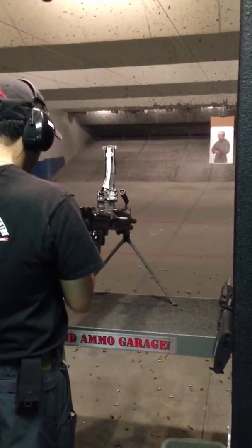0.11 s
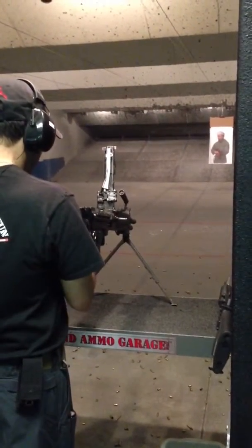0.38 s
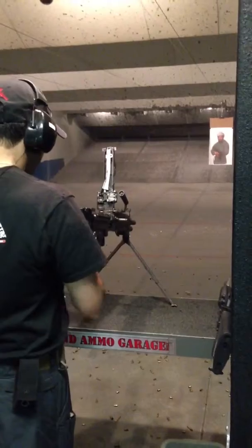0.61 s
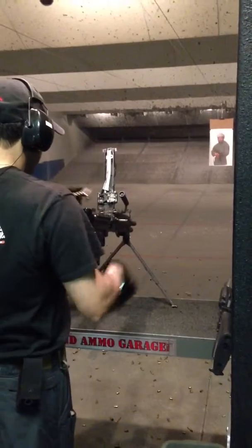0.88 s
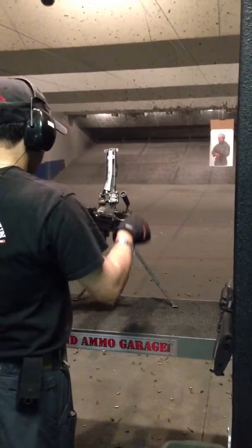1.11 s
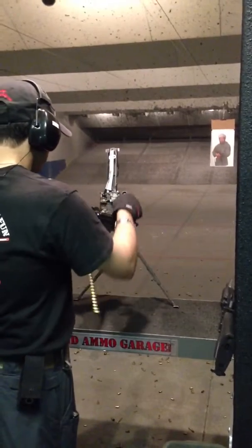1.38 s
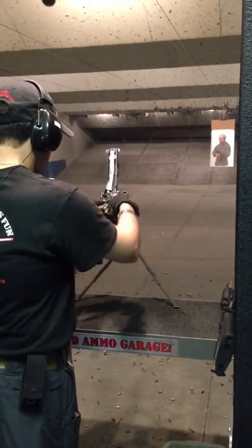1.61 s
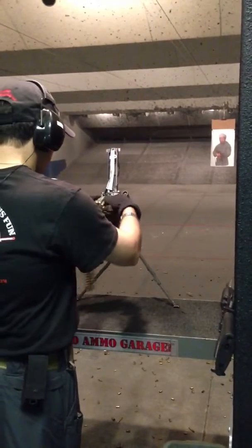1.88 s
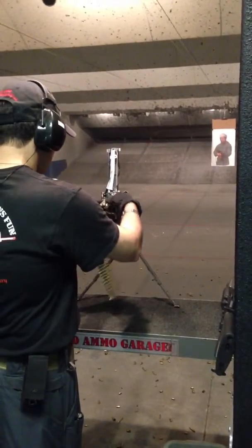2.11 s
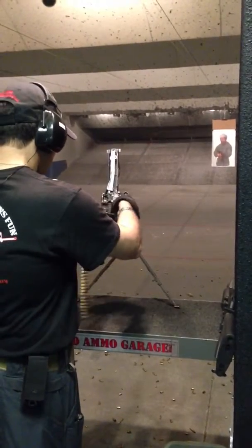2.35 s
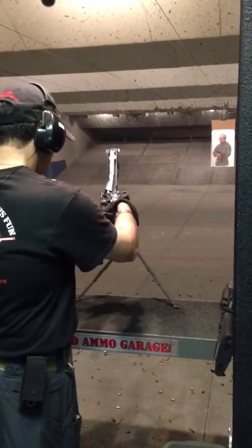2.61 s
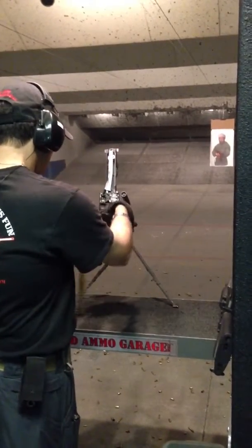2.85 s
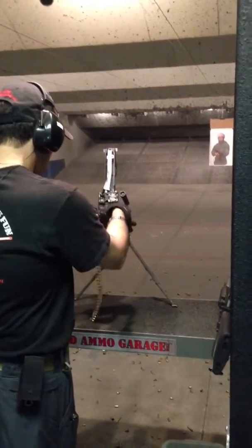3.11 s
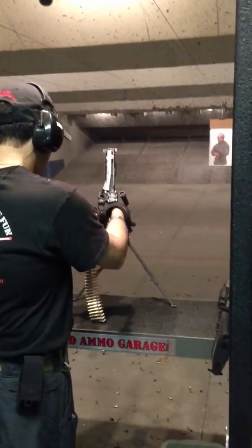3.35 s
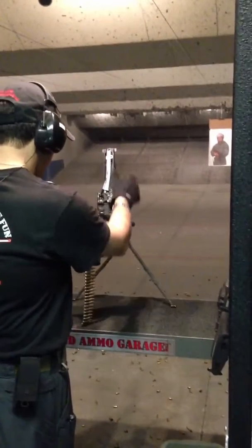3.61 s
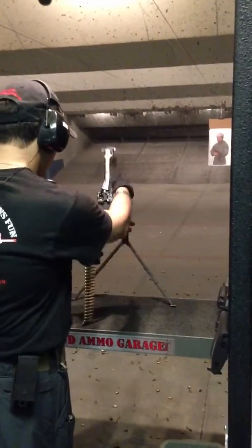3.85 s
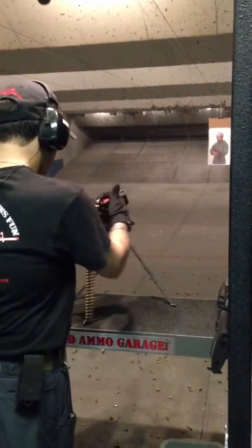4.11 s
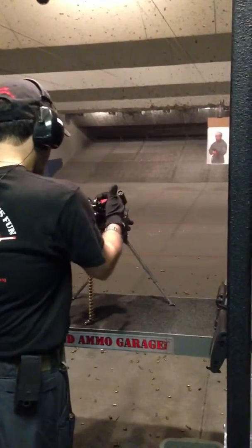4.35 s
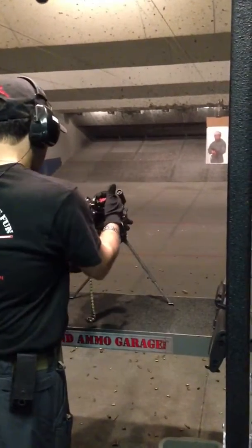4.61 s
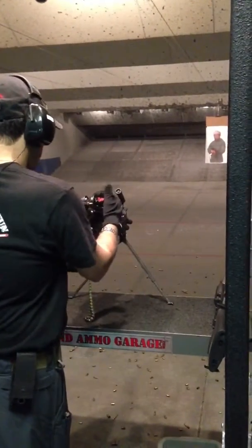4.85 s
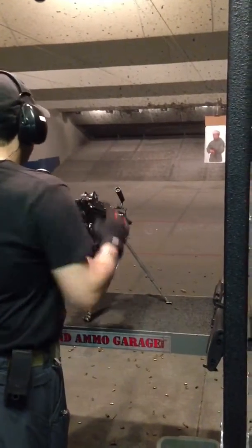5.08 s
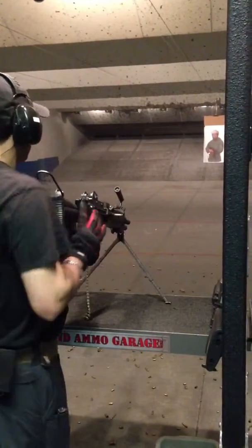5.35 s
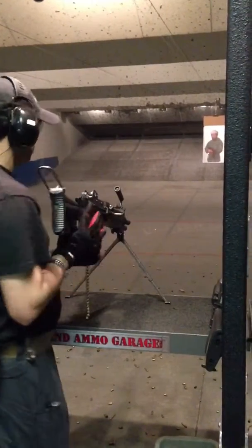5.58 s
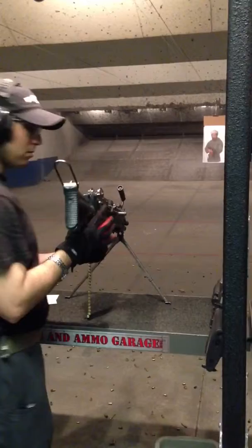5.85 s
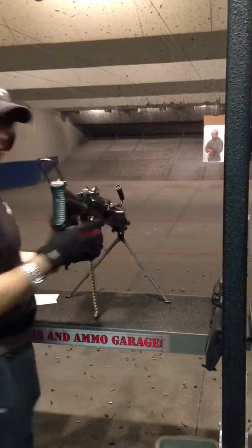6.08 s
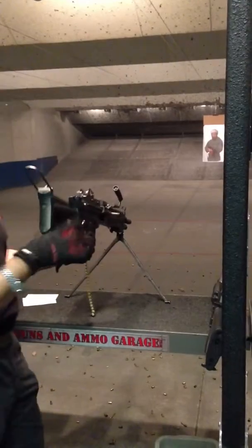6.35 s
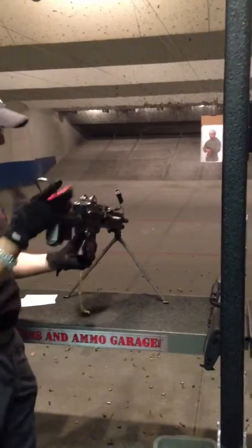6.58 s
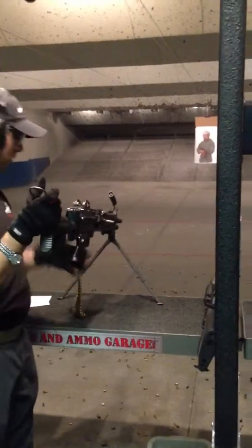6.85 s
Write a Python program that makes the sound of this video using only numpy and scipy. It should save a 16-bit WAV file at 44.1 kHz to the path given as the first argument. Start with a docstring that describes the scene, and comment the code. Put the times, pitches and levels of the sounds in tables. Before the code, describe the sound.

A phone close to the firing bench picks up deep ventilation rumble and widely spaced rifle shots from another lane, their booming reverberation filling the concrete hall. Between them come belt and metal clicks, high ringing bounces of brass cases, and a loud bright slam of a feed cover midway. Handling then becomes faint and sparse before a last shot roars near the end. The loud blasts sound squashed.

```python
"""Long concrete indoor range: single rifle shots from a neighbouring lane fill it with echo, over ventilation rumble.
Shots are shaped random reflections plus low pulses; the rumble is shaped noise with duct resonances.
Spent brass cases bounce and ring on the floor as beating sine modes.
Close by a gun is being loaded: belt clicks and a cover slammed shut, made of decaying noise.
A phone microphone with a limiter and slow gain control picks it up."""
import sys
import numpy as np
from scipy import signal
from scipy.fft import rfft, irfft
from scipy.io import wavfile
from scipy.ndimage import uniform_filter1d

SR = 44100
rng = np.random.default_rng(int(sys.argv[2]) if len(sys.argv) > 2 else 0)


def boost(x):
    """Linear amplitude factor 10**(x/20) for a level x in decibels (scalar or array-like)."""
    u = np.asarray(x, float) / 20
    return 10 ** u


def pcm_store(signal):
    """Save signal as 16-bit PCM."""
    levels = np.round(np.clip(np.atleast_2d(signal), -1, 1) * 32767)
    wavfile.write(sys.argv[1], SR, levels.astype(np.int16).T)


N = 306922  # samples

# spectrum shared by case ticks and metal clicks: hz, density_db_per_hz
CLICK_COLOUR = [(880, -43), (1500, -16), (2700, -2), (3180, -9), (4530, -0.5), (7670, 0.5), (13400, -6),
                (15500, -15)]


def evened(x):
    """Scales to rms 1."""
    return x / np.sqrt(np.mean(x ** 2) + 1e-20)


def read(table_hz, values, hz):
    """Reads a table along log frequency."""
    return np.interp(np.log(hz + 1), np.log(np.asarray(table_hz) + 1), values)


def add(mix, start_s, sound):
    """Mixes a sound in at start_s, which may lie before the start."""
    at = round(start_s * SR)
    sound = sound[max(-at, 0):]
    part = mix[max(at, 0):][:len(sound)]
    part += sound[:len(part)]


def coloured(colour, count):
    """Steady noise of rms 1 with the given spectrum."""
    hz = np.fft.rfftfreq(count, 1 / SR)
    spectrum = rfft(rng.standard_normal(count)) * boost(read(*np.transpose(colour), hz))
    return evened(irfft(spectrum, count))


def reflections(count):
    """STFT of sparse reflections of random sign and size, one in every 8 samples."""
    taps = np.zeros(count)
    slots = np.arange(0, count - 8, 8)
    taps[slots + rng.integers(0, 8, len(slots))] = rng.standard_normal(len(slots))
    return signal.stft(evened(taps), SR, nperseg=1024, noverlap=896)


def echo_shape(hz, t):
    """Hall gain over pitch and time: each band builds up, then dies at two speeds."""
    # echo of one shot by band: hz, level_db, late_tail_db (against level_db)
    hall = [(40, -54, -31), (110.4, -10, -32), (171, 12, -23), (340, 8, -21.5), (556, 5, -39.5),
            (1285, 0.5, -20), (1920, -3, -30), (2430, -1, -25), (4770, -3.5, -30.5), (9040, -8, -41.5),
            (13000, -11, -62), (15500, -14, -49)]
    # the roar holds until the longest paths run out, then drops: delay_s, drop_db, width_s
    step = (0.77, 2.7, 0.012)
    table_hz, *columns = np.transpose(hall)
    level_db, late_db = (read(table_hz, column, hz)[:, None] for column in columns)
    hz = hz[:, None] + 1

    # dB/s: walls take a steady share, air more with pitch, the deepest bass leaks out
    wall_db_per_s, air_db_per_s_khz, leak_hz = 37, 7.5, 82
    leak = np.minimum(leak_hz / hz, 2) ** 2
    fade_db_per_s = wall_db_per_s * (1 + leak) + air_db_per_s_khz * hz / 1000
    late_fade_db_per_s = 16.5 + 2 * hz / 1000

    build_cycles, build_max_s = 50, 0.31
    rise_s = np.minimum(build_cycles / hz, build_max_s)
    build = (1 - np.exp(-(t + 0.08) / rise_s)) ** 2
    decay = boost(-fade_db_per_s * t) + boost(late_db - late_fade_db_per_s * t)
    shape = boost(level_db) * build * decay

    delay_s, drop_db, width_s = step
    shape *= boost(-drop_db / (1 + np.exp((delay_s - t) / width_s)))
    # reflections bunch up in pitch and time
    lumps = uniform_filter1d(rng.standard_normal(shape.shape), 8, 0)
    lumps = uniform_filter1d(lumps, 16, 1)
    return shape * boost(1.22 * evened(lumps))


def wall_slaps(t):
    """A short low thump at each onset, then low pushes thrown back by the end walls, as Gaussian cosine pulses."""
    # delay_s, level_db, pitch_hz
    slaps = [(.003, -34.5, 60), (0.189, -10.5, 231), (0.333, -15, 232), (0.433, -19, 298),
             (0.681, -26, 215)]
    out = np.zeros(len(t))
    for delay_s, level_db, hz in slaps:
        late_s = t - delay_s
        out += boost(level_db) * np.cos(2 * np.pi * hz * late_s) * np.exp(-(hz * late_s / 1.14) ** 2)
    return out


def lead_in(t):
    """Runs ahead of the blast: a faint noise that grows, then a thin ring that swells."""
    # hiss spectrum: hz, density_db_per_hz
    lead_colour = [(240, -23), (400, 2.5), (2150, -11.5), (2970, -5), (3510, -5), (15500, -20)]
    ring_db, ring_hz, ring_s, swell_s = -8, 2922, .015, .0055
    hiss_db, hiss_rise_db_per_s = -36.5, 410
    swell = np.exp(-abs(t) / swell_s) * np.clip((t + ring_s) / ring_s * 4, 0, 1)
    ring = boost(ring_db) * swell * np.sin(2 * np.pi * ring_hz * t)
    hiss = boost(hiss_db + hiss_rise_db_per_s * (t - t[0])) * coloured(lead_colour, len(t))
    return ring + hiss


def blast_rush(t):
    """Dull noise that swells into the blast and dies briefly past it."""
    # hz, density_db_per_hz
    rush_colour = [(250, -23), (500, 2), (1500, -1), (2100, -8), (3000, -40.5)]
    level_db, swell_s = -3, 0.0031
    return boost(level_db) * np.exp(-abs(t) / swell_s) * coloured(rush_colour, len(t))


def shots():
    """Every shot wakes the same reflections; moving air renews the treble most."""
    # start_s, level_db
    shot_times = [(-.060, -1), (1.664, -0.5), (3.408, -1), (6.3921, -1)]
    shot_db, lead_s = 19, .022
    count = 3 * SR
    hz, frame_s, same = reflections(count)
    shape = echo_shape(hz, frame_s)

    # share of echo power new at each shot: at the bottom, and the pitch where half the rest is new
    new_low, new_half_hz = 0.13, 6000
    hz = hz[:, None] + 1
    new = new_low + (1 - new_low) * hz / (hz + new_half_hz)

    t = np.arange(count) / SR
    slaps = wall_slaps(t)
    ahead_s = np.arange(-lead_s, .004, 1 / SR)
    lead = lead_in(ahead_s)
    near_s = np.arange(-lead_s, lead_s, 1 / SR)
    rush = blast_rush(near_s)

    out = np.zeros(N)
    for start_s, level_db in shot_times:
        z = np.sqrt(1 - new) * same + np.sqrt(new) * reflections(count)[2]
        echo = signal.istft(z * shape, SR, nperseg=1024, noverlap=896)[1][:count]
        onset = np.minimum(t / 0.0021, 1)
        add(out, start_s, boost(shot_db + level_db) * (echo + slaps) * onset)
        add(out, start_s + ahead_s[0], lead)
        add(out, start_s + near_s[0], rush)
    return out


def ventilation():
    """Low rumble of fans with fuzzy duct resonances; the level wanders a little."""
    # broad noise: hz, density_db_per_hz
    air = [(15, -60), (25, -42.5), (90, -17), (160, -9.5), (310, -12.5), (355, -22.5), (800, -17.5),
           (1050, -26), (3600, -35.5), (7300, -45), (10500, -54), (15500, -57)]
    # duct resonances: pitch_hz, width_hz (at -6 dB), peak_db_per_hz
    ducts = [(126.7, 18.6, -3.5), (142.4, 13, -5), (188.4, 50, -1), (261.8, 9, 3), (298.3, 6, -5.5),
             (410.6, 29, -12)]
    air_db, wander_db = -34, 0.19
    hz = np.fft.rfftfreq(N, 1 / SR)
    power = boost(2 * read(*np.transpose(air), hz))
    for duct_hz, width_hz, peak_db in ducts:
        power += boost(2 * peak_db) / (1 + (2 * (hz - duct_hz) / width_hz) ** 2) ** 2
    wander = uniform_filter1d(rng.standard_normal(N), 6000)
    wander = evened(uniform_filter1d(wander, 6000))
    rumble = evened(irfft(rfft(rng.standard_normal(N)) * np.sqrt(power), N))
    return rumble * boost(air_db + wander_db * wander)


def cases():
    """Brass on the floor: a tick, then two tube modes, each a close pair that beats."""
    # first_landing_s, low_mode_hz, high_mode_hz
    brass = [(.95, 7630, 12010), (2.54, 7190, 12130), (4.23, 7165, 11630)]
    # start_s, level_db, high_mode_db (a harder knock wakes it more)
    bounces = [(0.956, -45.5, 3), (0.9912, -44, -14), (1.06, -60, -12), (1.2915, -55, -25),
               (1.325, -54, -25), (1.505, -58, -20), (2.5437, -42.5, -13), (2.9244, -42, -6),
               (2.94, -47, -10), (3.029, -49, -16), (3.1163, -44, -18), (3.15, -50, -17),
               (3.1862, -47.5, -20), (3.311, -58, -20), (4.2394, -50, 2), (4.571, -39, -13),
               (4.7646, -45, -18), (4.8265, -46.5, -5), (4.9327, -54, -14), (5.056, -51, -16),
               (5.101, -46, -12), (5.2046, -56, -16)]
    low_t60_s, split_hz, detune_hz = 0.39, 22.4, 10
    tick_db, tick_slope = -6.5, 0.54  # tick level follows hardness
    out, t = np.zeros(N), np.arange(SR // 2) / SR
    ticks = coloured(CLICK_COLOUR, len(t)) * boost(-60 * t / 0.16)
    beat = 2 * np.pi * split_hz * t
    for start_s, level_db, high_db in bounces:
        # a bounce belongs to the case that landed last
        modes_hz = np.array([row for row in brass if row[0] < start_s][-1][1:])
        low_turn, high_turn, shift = rng.random(3)
        low_hz, high_hz = modes_hz + detune_hz * (2 * shift - 1)
        low_beat = 1 + 0.58 * np.cos(beat + 2 * np.pi * low_turn)
        high_beat = 1 + 0.41 * np.cos(2 * beat + 2 * np.pi * high_turn)
        low = np.sin(2 * np.pi * low_hz * t) * low_beat * boost(-60 * t / low_t60_s)
        high = np.sin(2 * np.pi * high_hz * t) * high_beat * boost(high_db - 90 * t / low_t60_s)
        tick = boost(tick_db + tick_slope * high_db) * ticks
        add(out, start_s, boost(level_db) * (0.87 * (low + high) + tick))
    return out


def clicks():
    """Metal parts and belt links: bright noise cracks, each with one fuzzy ring of clustered modes."""
    # start_s, level_db, ring_hz, ring_db (against the crack)
    click_times = [(1.1122, -24.5, 4570, -10), (1.175, -50, 4360, -9), (1.264, -52, 4300, -9),
                   (1.4992, -36.5, 6990, -9), (2.35, -31.5, 6930, -6), (2.5266, -41, 4270, 7),
                   (2.7626, -50, 10500, -8), (2.89, -39.5, 5160, -5), (3.0628, -46, 5530, 0),
                   (3.2492, -48, 13000, -15), (4.745, -56, 4300, 9), (5.3456, -50, 3430, 4),
                   (5.831, -70, 10700, 8), (6.197, -53, 8500, -8)]
    rise_s, crack_t60_s, tail_t60_s, ring_t60_s = 0.0014, 0.069, 0.3, 0.12
    skirt_hz = 550  # ring spectrum is 30 dB down this far off centre
    out, t = np.zeros(N), np.arange(SR // 2) / SR
    for start_s, level_db, hz, ring_db in click_times:
        cluster = [(hz - skirt_hz, -30), (hz, 0), (hz + skirt_hz, -30), (SR / 2, -60)]
        ring = coloured(cluster, len(t)) * boost(ring_db - 60 * t / ring_t60_s)
        decay = boost(-60 * t / crack_t60_s) + boost(-19 - 60 * t / tail_t60_s)
        crack = coloured(CLICK_COLOUR, len(t)) * decay
        add(out, start_s, boost(level_db) * (1 - np.exp(-t / rise_s)) * (crack + ring))
    return out


def cover_slam():
    """Feed cover slams: a noise burst of steel and a booth echo that darkens as it dies."""
    # level_db, t60_s, booth_echo_db, booth_fade_db_per_s, extra_fade_db_per_s_per_khz
    slam = (5.5, 0.087, -29, 40, 6)
    # hz, density_db_per_hz
    slam_colour = [(350, -22), (600, -4.5), (2250, -4.5), (2870, -6.5), (4200, -3), (6000, -6.5),
                   (11500, -7.5), (15500, -16.5)]
    start_s, rise_s = 4.0575, 0.0043
    level_db, t60_s, echo_db, fade, extra_fade = slam
    out, t = np.zeros(N), np.arange(SR // 2) / SR
    steel = coloured(slam_colour, len(t)) * boost(-60 * t / t60_s)
    hz, frame_s, z = signal.stft(coloured(slam_colour, len(t)), SR, nperseg=256)
    z = z * boost(echo_db - frame_s * (fade + extra_fade * hz[:, None] / 1000))
    booth = signal.istft(z, SR, nperseg=256)[1][:len(t)]
    add(out, start_s, boost(level_db) * (1 - np.exp(-t / rise_s)) * (steel + booth))
    return out


def scene():
    """All sources, one channel."""
    return (shots() + ventilation() + cases() + clicks() + cover_slam())[None]


def turned_down(x, size, knee_db, share, back_db_per_s):
    """Cuts a share of the level above the knee and gives it back at a steady rate; size in samples."""
    power_db = 10 * np.log10(abs(uniform_filter1d(x ** 2, size)) + 1e-12)
    ramp_db = np.arange(len(x)) * back_db_per_s / SR
    over_db = np.maximum(power_db - knee_db, 0) * share
    held_db = np.maximum.accumulate(over_db + ramp_db) - ramp_db
    return x / boost(uniform_filter1d(held_db, size // 2))


def top_cut(x):
    """Nothing passes above the cut-off."""
    return signal.sosfilt(signal.butter(12, 15980, fs=SR, output="sos"), x)


def record(dry):
    """Phone microphone: slow gain control, quick limiter, soft clipping, band limit."""
    x = turned_down(dry[0], size=1200, knee_db=-36.0, share=0.21, back_db_per_s=5.0)
    x = turned_down(x, size=200, knee_db=-12.5, share=0.87, back_db_per_s=76.5)
    x = 0.83 * np.tanh(x / 0.79)
    edge_hz = 15350
    mix = signal.oaconvolve(x, signal.firwin(255, edge_hz, fs=SR), "same")[None]
    return top_cut(mix)


dry = scene()
out = record(dry)
pcm_store(out)
```